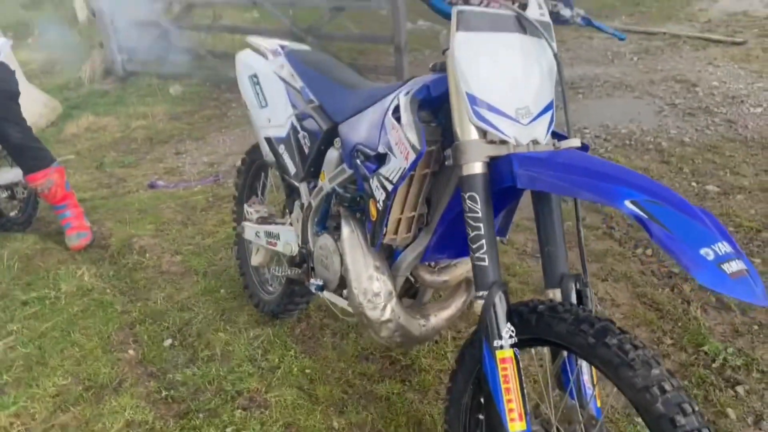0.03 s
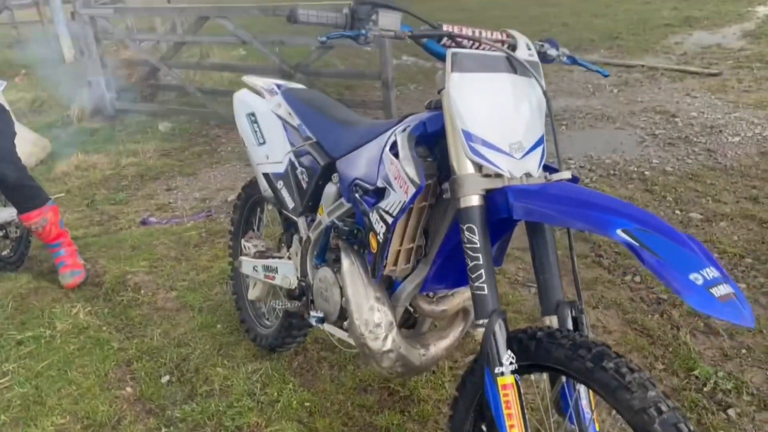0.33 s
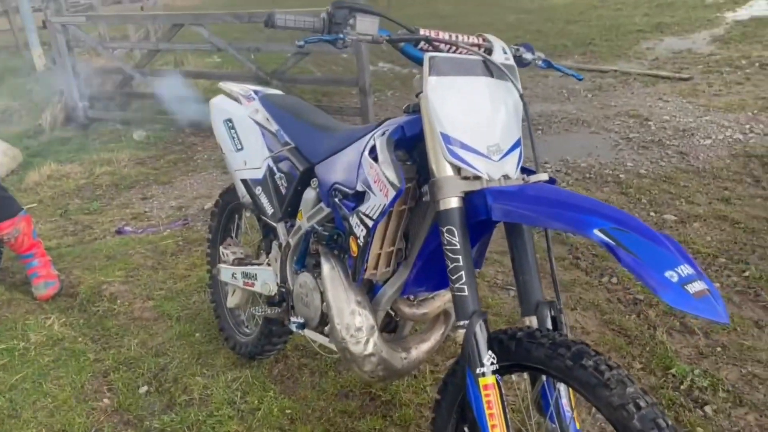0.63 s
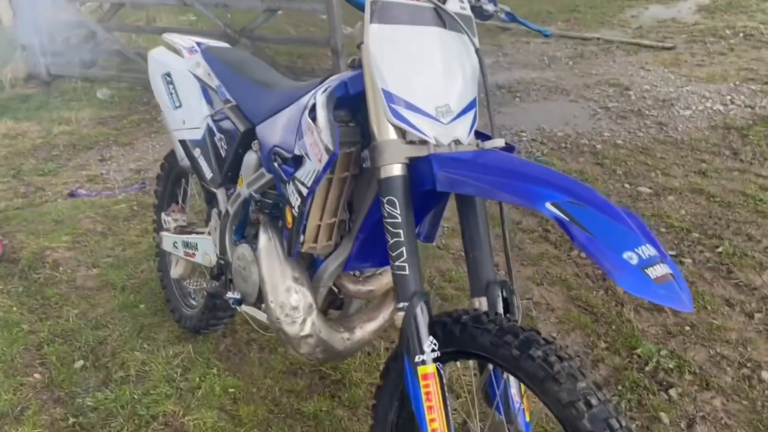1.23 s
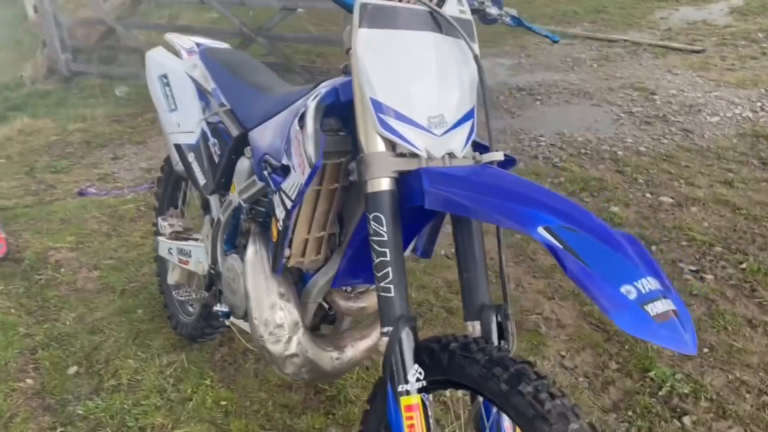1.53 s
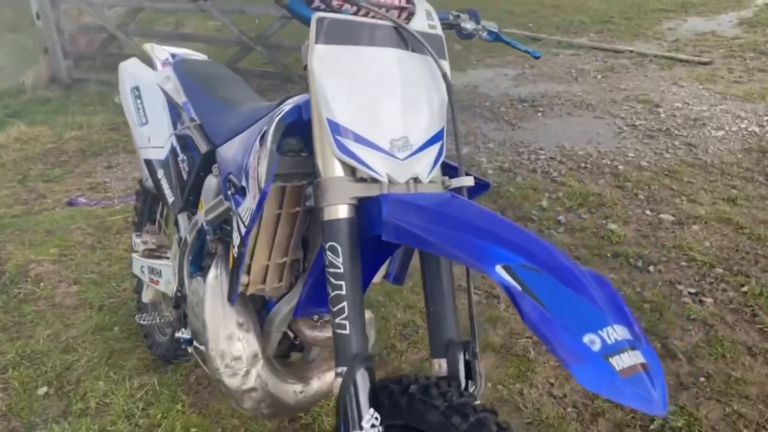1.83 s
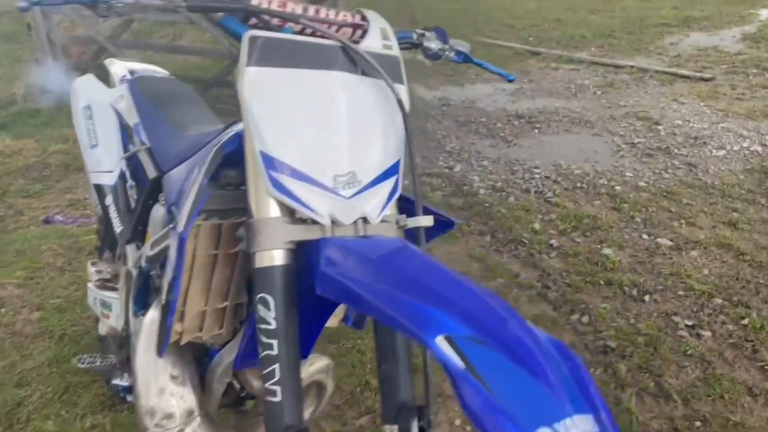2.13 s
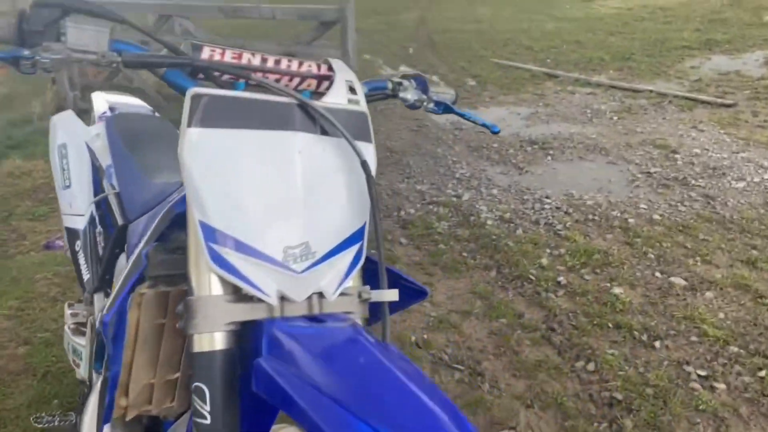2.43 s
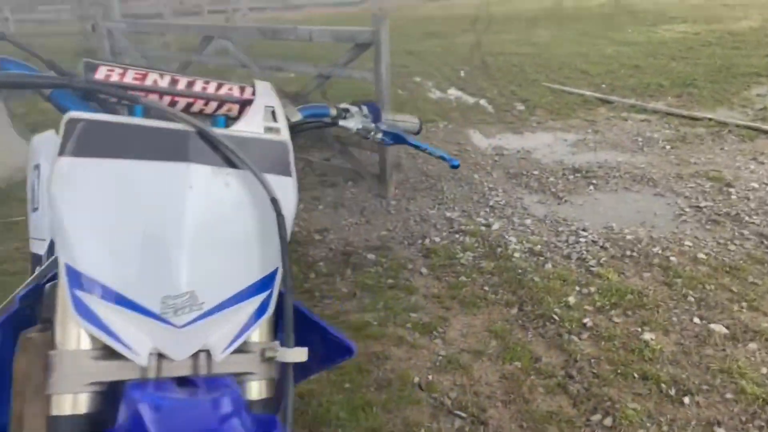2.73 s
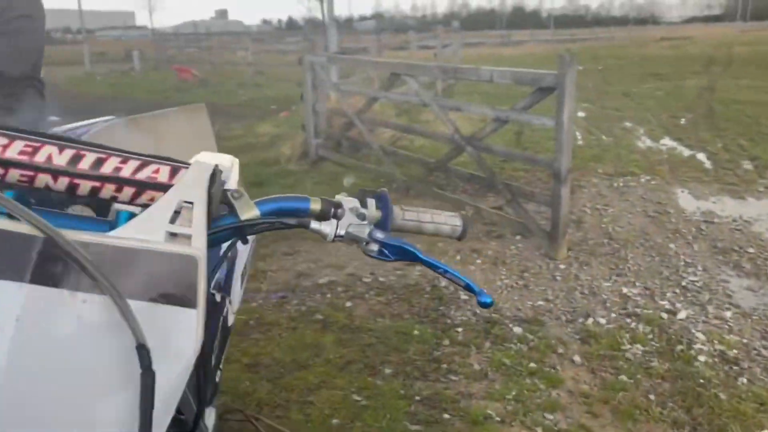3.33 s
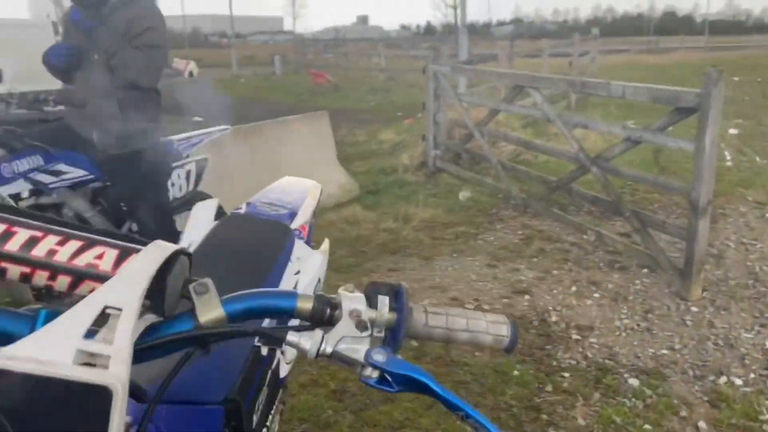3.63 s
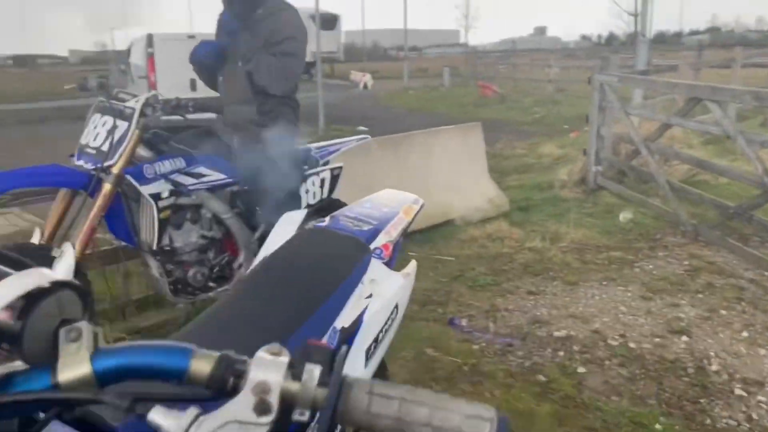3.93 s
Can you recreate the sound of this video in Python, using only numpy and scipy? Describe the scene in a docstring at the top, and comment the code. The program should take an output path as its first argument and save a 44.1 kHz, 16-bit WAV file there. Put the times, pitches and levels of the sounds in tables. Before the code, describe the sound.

A two-stroke dirt bike idles unevenly outdoors, rumbling and rattling with a few dry knocks. Irregular sharp pops crack over it four or five times a second, and the exhaust bark grows as the close microphone moves around it.

```python
"""A two-stroke dirt bike thumps and barks at idle on open ground, sharp exhaust pops cracking over it.
Each firing sounds the pipe and rattles the engine's metal, above an uneven rumble and a hiss of gas.
Now and then the engine knocks, or a firing misses and leaves a dull puff. The pops, shocks bouncing
in a silencer, likely a second bike's, come four or five times a second, out of step with the idle.
The balance shifts as the microphone walks from the idling bike's side to its front."""
import sys
import numpy as np
from scipy import signal
from scipy.fft import rfft, irfft, next_fast_len
from scipy.io import wavfile
from scipy.ndimage import uniform_filter1d

SR = 44100
rng = np.random.default_rng(int(sys.argv[2]) if len(sys.argv) > 2 else 0)


def store_pcm(level_fs):
    """Save levels as 16-bit WAV."""
    pcm = np.round(np.clip(level_fs, -1, 1) * 32767).astype(np.int16)
    wavfile.write(sys.argv[1], SR, np.atleast_2d(pcm).T)


N = 176400
OPPOSED = np.array([[1], [-1]])  # left and right in opposite polarity, for width


def amp(db):
    """Decibels to gain."""
    return 10 ** (np.asarray(db) / 20)


def unit(x):
    """Scaled to rms 1."""
    return x / np.sqrt(np.mean(x ** 2) + 1e-20)


def along(points, hz):
    """Read (Hz, value) points on a log frequency axis."""
    f, v = np.transpose(points)
    return np.interp(np.log(hz + 1), np.log(f + 1), v)


def curves(rows):
    """One automation curve for each column after the time."""
    s, *cols = np.transpose(rows)
    return [np.interp(np.arange(N) / SR, s, c) for c in cols]


def filtered(x, response):
    """x through a complex frequency response."""
    m = next_fast_len(N + SR // 2)
    return irfft(rfft(x, m) * response(np.fft.rfftfreq(m, 1 / SR)), m)[..., :N]


def body(x, colour, size=16384):
    """x rings a minimum-phase body of the given colour."""
    cepstrum = irfft(np.log(amp(along(colour, np.fft.rfftfreq(size, 1 / SR)))))
    cepstrum[1:size // 2] *= 2
    cepstrum[size // 2 + 1:] = 0
    return signal.fftconvolve(x, irfft(np.exp(rfft(cepstrum))))[:N]


def noise(colour):
    """Coloured noise of rms 1."""
    return unit(filtered(rng.standard_normal(N), lambda hz: amp(along(colour, hz))))


def spread(make, side_db):
    """Stereo from a centred draw of a sound and a weaker opposed one."""
    return make() + amp(side_db) * OPPOSED * make()


def pulses(times, sizes, scatter_db, jitter_s):
    """One impulse per event, uneven in size and time."""
    chance = rng.standard_normal((len(times), 2))
    at = np.clip(np.round((times + jitter_s * chance[:, 0]) * SR), 0, N).astype(int)
    return np.bincount(at, sizes * amp(scatter_db * chance[:, 1]), N + 1)[:N]


def dying(train, t60, rise_s=0.0021):
    """An envelope that swells briefly at each impulse and dies away."""
    t = np.arange(SR // 8) / SR
    shape = (1 - np.exp(-t / rise_s)) * amp(-60 * t / t60)
    return unit(signal.fftconvolve(train, shape)[:N])


# The low bed, direct and scattered. Each row: frequency in Hz, level in dB.
RUMBLE_EQ = [(15, -34), (35, -11), (65, 0.5), (130, -2), (200, -5.5), (320, -6), (420, -22.5), (700, -13),
             (1500, -38.5), (5000, -52)]
DIFFUSE_RUMBLE_EQ = [(20, -33), (70, -5), (150, -3.5), (320, -3.5), (450, -13), (900, -19.5), (3000, -75)]


def rumble():
    """Turbulent exhaust rumbles, widened by scatter from the surroundings."""
    return noise(RUMBLE_EQ) + OPPOSED * amp(-4) * noise(DIFFUSE_RUMBLE_EQ)


# Metallic rings. Each row: pitch in Hz, width in Hz, level in dB.
WALL_MODES = [(1970, 190, -1), (2540, 110, 3), (2730, 110, 1), (3070, 50, 3), (3400, 20, 6), (3948, 23, 0),
              (4470, 40, -9), (5250, 25, -7)]


def wall_ring(drive):
    """The cylinder and pipe walls ring in narrow modes."""
    return unit(filtered(drive, lambda hz: sum(
        amp(db) * 1j * hz * width / (pitch ** 2 - hz ** 2 + 1j * hz * width)
        for pitch, width, db in WALL_MODES)))


# Engine faders along the walk. Each row: time in seconds, then rattle, ring and hiss in dB.
ENGINE_FADERS = [(0.0, -39, -26, -49.5), (0.5, -38, -31, -49), (0.96, -42.5, -32.5, -50),
                 (1.22, -41.5, -36, -49.5), (1.37, -39.5, -36, -49.5), (1.83, -37.5, -34.5, -48.5),
                 (2.93, -43.5, -36.5, -49), (3.42, -40, -45, -51), (4.0, -36.5, -61, -46.5)]
# Tone of the rattle and of the gas hiss. Each row: frequency in Hz, level in dB.
RATTLE_EQ = [(400, -44), (800, 2), (1200, 0.5), (1700, 2), (2600, -7.5), (4000, -11), (6000, -37),
             (16000, -54)]
GAS_EQ = [(300, -37), (900, -2), (2700, 2.5), (4000, -6), (6500, -2), (9000, -13.5), (12000, -20.5),
          (15500, -48)]


def clatter(times, steady=0.34, slap_delay_s=0.01):
    """Firing and piston slap shake the metal twice a turn, over the even hiss of moving gas."""
    rattle_db, ring_db, hiss_db = curves(ENGINE_FADERS)
    blows = pulses(times, 0.79, scatter_db=4, jitter_s=0.00029)
    slaps = pulses(times + slap_delay_s, 0.45, scatter_db=4.5, jitter_s=0.0011)
    shake = unit(steady + dying(blows + slaps, t60=0.045))
    rattle = spread(lambda: shake * noise(RATTLE_EQ), side_db=-19)
    ring = spread(lambda: wall_ring(shake * rng.standard_normal(N)), side_db=-18)
    hiss = noise(GAS_EQ)
    return amp(rattle_db + 0.5) * rattle + amp(ring_db - 11.5) * ring + amp(hiss_db + 6.5) * hiss


# Knock cues. Each row: start in seconds, level in dB.
KNOCK_CUES = [(1.291, -15), (1.402, -17), (1.846, -16), (2.429, -17), (2.547, -17), (2.6665, -12)]
# Their hard midrange. Each row: frequency in Hz, level in dB.
KNOCK_EQ = [(150, -27), (450, 1), (750, 2), (1300, -9), (2500, -17), (6000, -29), (14000, -65)]


def knocks():
    """Now and then the engine gives one harder, dry knock."""
    times, db = np.transpose(KNOCK_CUES)
    knock = body(pulses(times, amp(db), scatter_db=1.5, jitter_s=0), KNOCK_EQ)
    return knock * amp(db.max()) / abs(knock).max()


# Weak or missed firings. Each row: start in seconds, firing loss in dB, puff level in dB.
MISFIRE_CUES = [(0.034, 12, -13), (0.305, 8, -26), (0.447, 24, -10), (.692, 28, -16.5), (1.041, 27, -18),
                (1.099, 34, -13), (1.158, 16, -19), (1.795, 9, -30), (2.074, 32, -13), (2.129, 41, -26),
                (2.44, 1.5, -17), (2.669, 26, -8.5), (2.978, 21, -13), (3.034, 5, -8.5), (3.451, 10, -17),
                (3.674, 1.5, -14)]
# The muffled puff. Each row: frequency in Hz, level in dB.
PUFF_EQ = [(25, -40), (60, 5), (100, 6), (130, 3.5), (200, -8.5), (330, -22.5), (450, -38), (900, -45),
           (4000, -110)]


def puffs():
    """A missed charge leaves the pipe as a dull puff."""
    times, _, db = np.transpose(MISFIRE_CUES)
    puff = body(pulses(times, amp(db), scatter_db=2, jitter_s=0.000067), PUFF_EQ)
    return puff * amp(db.max()) / abs(puff).max()


# The wavering idle. Each row: time in seconds, crank turns per second.
IDLE_SPEED = [(0.0, 36.5), (0.3, 36.24), (0.6, 36.34), (0.8, 36.6), (0.95, 37.08), (1.1, 35.91),
              (1.35, 35.96), (1.6, 36.12), (1.9, 35.82), (2.15, 35.55), (2.4, 35.65), (2.7, 34.98),
              (2.9, 35.99), (3.02, 35.13), (3.15, 36.21), (3.5, 35.91), (3.8, 35.73), (4.0, 36.11)]


def firings(first_s=-0.002):
    """Time and strength of each firing, one per turn of the crank, weakened at the misfires."""
    turns = np.cumsum(curves(IDLE_SPEED)[0]) / SR
    times = np.interp(np.arange(int(turns[-1]) + 1), turns, np.arange(N) / SR) + first_s
    sizes = np.ones(len(times))
    for start, loss_db, _ in MISFIRE_CUES:
        sizes[np.argmin(abs(times - start))] = amp(-loss_db)
    return times, sizes


# The pipe's deep voice. Each row: frequency in Hz, level in dB.
PIPE_EQ = [(20, -46), (36, -39), (60, -10), (73, -1), (106, -20.5), (146, 0.5), (180, -1), (250, -7.5),
           (290, -8), (325, -5.5), (365, -24), (420, -50), (900, -73.5), (4000, -110)]
# A shelf on its upper notes along the walk. Each row: time in seconds, gain in dB.
SHELF_FADER = [(0.0, -1), (1.0, 2), (1.5, 2), (2.5, 0), (3.0, -0.5), (4.0, -4.5)]


def thumps(times, sizes, delay_s=0.0016, lag_hz=134.4, lag_width_hz=116, echo_s=0.00301, shelf_hz=250):
    """Each firing thumps the pipe; the low notes come out last, so the pitch falls."""
    def lag_and_echo(hz):
        pole = lag_hz ** 2 - hz ** 2 + 1j * hz * lag_width_hz
        echo = -0.077 * np.exp(-2j * np.pi * hz * echo_s)  # returns inverted from the open end
        return np.conj(pole) / pole * (1 + echo)

    push = pulses(times + delay_s, sizes, scatter_db=0.7, jitter_s=0.00006)
    thump = unit(body(filtered(push, lag_and_echo), PIPE_EQ))
    upper = filtered(thump, lambda hz: 1 - 1 / (1 + (hz / shelf_hz) ** 10))
    return thump + (amp(curves(SHELF_FADER)[0]) - 1) * upper


def bark(blows, colour, rough):
    """Each firing barks through the exhaust, roughened by a short burst of noise."""
    burst = dying(blows, t60=0.039)
    rasp = spread(lambda: unit(body(burst * rng.standard_normal(N), colour)), side_db=-0.5)
    return unit(unit(body(blows, colour)) + rough * rasp)


# Exhaust faders along the walk. Each row: time in seconds, then low end, low bark and high bark in dB.
EXHAUST_FADERS = [(0.0, -19.5, -56, -42), (0.07, -22, -36.5, -33), (0.93, -22, -38.5, -34.5),
                  (1.55, -20.5, -39.5, -34), (2.1, -20, -53, -37), (2.17, -19, -35, -33.5),
                  (3.91, -19, -25.5, -31), (4.0, -18.5, -28, -30)]
# The bark's two voices. Each row: frequency in Hz, level in dB.
LOW_BARK_EQ = [(100, -54), (200, -78), (390, -10), (435, -3), (470, 1.5), (502, 2.5), (545, -10.5),
               (580, 1.5), (612, 1), (650, 5), (690, -1), (725, -1), (780, -5), (1500, -50), (4000, -91),
               (12000, -110)]
HIGH_BARK_EQ = [(300, -52.5), (520, -16), (630, 8), (800, 2.5), (930, -5), (1100, -11.5), (2500, -33),
                (6000, -48.5), (14000, -100)]


def exhaust(times, sizes, bark_trim_db=2):
    """Each firing gives a short bark, then the pipe's deep thump, over the rumble."""
    low_end_db, low_db, high_db = curves(EXHAUST_FADERS)
    thump = thumps(times, sizes)
    blows = pulses(times, sizes, scatter_db=1.2, jitter_s=0.00005)
    low_bark = amp(low_db) * bark(blows, LOW_BARK_EQ, rough=0.13)
    high_bark = amp(high_db) * bark(blows, HIGH_BARK_EQ, rough=0.22)
    low_end = amp(low_end_db) * (thump + amp(-7) * rumble())
    return low_end + amp(bark_trim_db) * (low_bark + high_bark)


# A pop's hiss, its scatter and its low blast. Each row: frequency in Hz, level in dB.
HISS_EQ = [(300, -31), (700, 2.5), (1200, 1), (2100, -5), (3500, -6), (5500, -4), (8000, -7),
           (10500, -14.5), (13000, -14), (15700, -19)]
SCATTER_EQ = [(400, 7.5), (1200, -11), (2500, 7.5), (4500, 8), (7000, -15), (15000, -22)]
BLAST_EQ = [(60, -38), (130, -19), (300, -4), (420, -26), (700, -7), (1200, -11), (4000, -50)]


def pop_hiss():
    """A pop's blast sputters, rings the pipe walls and scatters off the surroundings."""
    sputter = unit(uniform_filter1d(rng.standard_normal(N), size=50))
    hiss = sputter * noise(HISS_EQ) + OPPOSED * amp(-4) * noise(SCATTER_EQ)
    ring = wall_ring(rng.standard_normal(N))
    return hiss + amp(-4.5) * ring + amp(-7) * noise(BLAST_EQ)


# Pop cues, levels before trim. Each row: start in seconds, crack level in dB, silencer pitch in Hz,
# hiss level in dB, wall pitch in Hz, wall level in dB, thud level in dB.
POP_CUES = [(0.2337, 0.5, 1150, -25, 2970, -27, -29.5), (0.4231, -10.5, 1042, -40.5, 3400, -51, -46),
            (0.5288, -15, 1580, -42.5, 3470, -48, -48), (0.6367, -5.5, 1230, -33, 5330, -37, -40),
            (0.873, -10.5, 1240, -41, 3400, -54, -31), (1.005, -11, 1305, -37, 3400, -50, -34),
            (1.1917, -5.5, 1300, -28, 2930, -44, -30), (1.418, -5, 1110, -24.5, 3360, -29, -30),
            (1.613, -13, 1030, -45.5, 3400, -48, -41), (1.7223, -4, 1085, -26.5, 5592, -40, -38),
            (1.9354, 0.5, 1073, -24.5, 5220, -32, -44), (2.148, -9.5, 1034, -31.5, 5140, -39, -24),
            (2.3491, -2.5, 1170, -24.5, 4430, -29, -23.5), (2.6031, -4.5, 1110, -24.5, 3980, -28, -22),
            (2.818, -2.5, 1410, -25.5, 3050, -32, -19.5), (3.0424, -2.5, 1560, -26, 3668, -31, -17),
            (3.3262, -9.5, 1330, -36.5, 3400, -46, -14.5), (3.5832, -2.5, 1400, -26, 5592, -33, -16.5),
            (3.8748, -8.5, 1570, -34.5, 3400, -70, -20)]
# A pop's sharp edge and its low body. Each row: frequency in Hz, level in dB.
CRACK_EQ = [(200, -45), (550, -29), (800, 2), (1200, 12.5), (2100, 9.5), (3200, -4.5), (6000, -33.5),
            (15000, -12)]
THUD_EQ = [(100, -38), (200, -21), (300, -3), (430, 0), (600, -23), (1000, -14), (4000, -70)]


def cracks(count=6, stretch=0.038, echo_gain=0.58):
    """Each pop's shock bounces inside the silencer, ever slower and weaker."""
    shocks, bounce = np.zeros(N), np.arange(count)
    for start, db, silencer_hz, *_ in POP_CUES:
        arrivals = start + 0.00039 + bounce * (1 + stretch * bounce) / silencer_hz
        shocks += pulses(arrivals, amp(db) * echo_gain ** bounce, scatter_db=1.5, jitter_s=0.00004)
    crack = body(shocks, CRACK_EQ)
    return crack * amp(-4) * shocks.max() / abs(crack).max()


def pops(delay_s=0.0035, fade_in_s=0.0048):
    """Each pop cracks, with a quickly faded-in hiss and a thud; silencer and pipe wall ring on."""
    hiss, tones, thud = np.zeros((3, N))
    for start, db, silencer_hz, hiss_db, wall_hz, wall_db, thud_db in POP_CUES:
        at = int(start * SR)
        near = np.arange(max(at - SR // 20, 0), min(at + SR // 2, N))
        t = near / SR - start - delay_s
        age = abs(t)
        decay = lambda level_db, t60: amp(level_db - 60 * age / t60)
        fade_in = amp(3) * np.exp(-age / fade_in_s)
        fall = decay(0, t60=0.073) + decay(-20, t60=0.36)
        hiss[near] += amp(hiss_db + 7) * np.where(t < 0, fade_in, fall)
        silencer = decay(db - 24.5, t60=0.055) * np.sin(2 * np.pi * silencer_hz * age)
        wall = decay(wall_db, t60=0.19) * np.sin(2 * np.pi * wall_hz * age)
        tones[near] += (t > 0) * (silencer + wall)
        thud[near] += (t > 0) * decay(thud_db, t60=0.11)
    return cracks() + tones + hiss * pop_hiss() + thud * noise(THUD_EQ)


# Stereo phase. Each row: frequency in Hz, lead of the left side in radians.
LEFT_LEAD = [(0, 0), (200, -.1), (500, -.45), (1100, -.45), (1600, 0), (2000, .15), (3000, .8), (4300, 1.4),
             (5000, .3), (5600, .8), (7000, 3.05), (8300, 3.25), (9600, 6.2), (12300, 6.4), (13300, 9.3),
             (16000, 9.6)]
# Stereo balance. Each row: frequency in Hz, left minus right in dB.
BALANCE = [(60, 0.0), (110, -0.5), (200, 2), (380, 2), (700, 2.0), (1290, 1), (2380, -0.5), (4400, 1),
           (8120, -2.5), (15000, 2.5)]


def scene():
    """The idling bike and the pops, likely a second bike's, reach two closely spaced microphone ports."""
    times, sizes = firings()
    mix = exhaust(times, sizes) + puffs() + clatter(times) + knocks() + pops()
    sides = OPPOSED / 2
    ports = lambda hz: amp(sides * along(BALANCE, hz)) * np.exp(1j * sides * along(LEFT_LEAD, hz))
    return filtered(mix, ports)


def record(dry, ceiling=0.9, top_hz=16300):
    """The highest peaks are rounded off and the very top of the treble is cut."""
    rounded = dry / (1 + abs(dry / ceiling) ** 8) ** (1 / 8)
    return filtered(rounded, lambda hz: hz < top_hz)


dry = scene()
out = record(dry)
store_pcm(out)
```